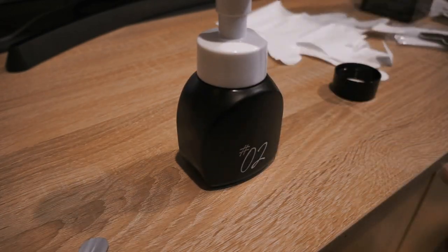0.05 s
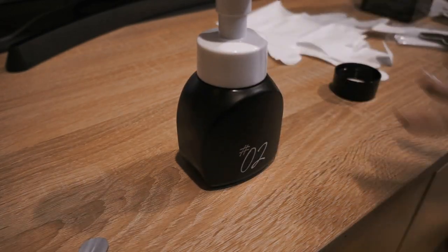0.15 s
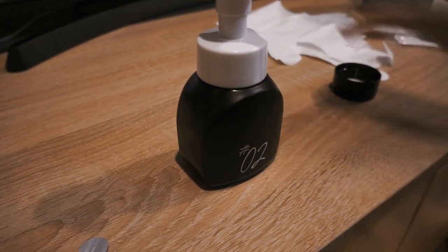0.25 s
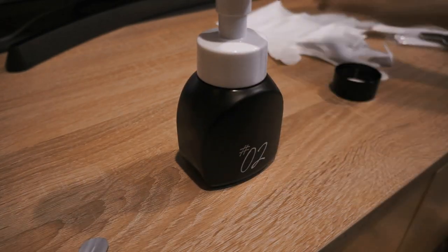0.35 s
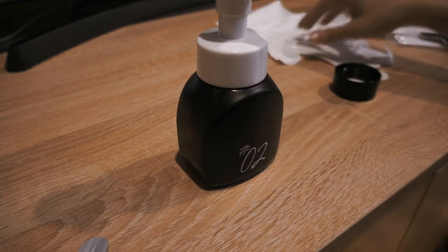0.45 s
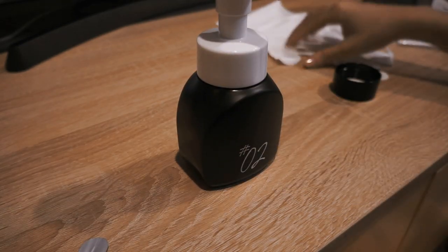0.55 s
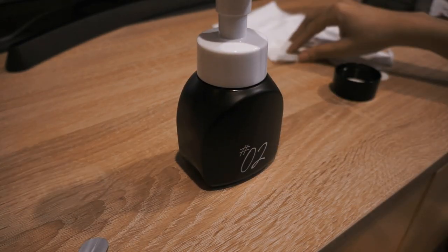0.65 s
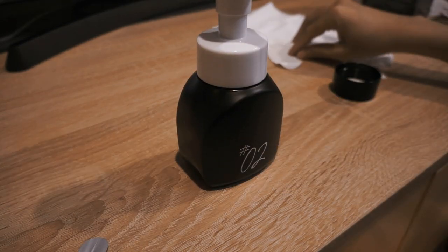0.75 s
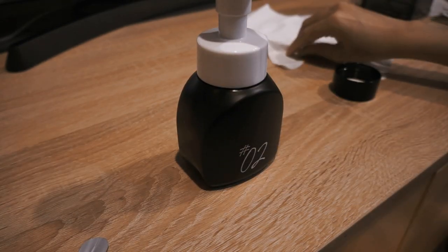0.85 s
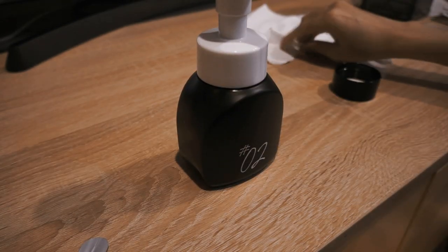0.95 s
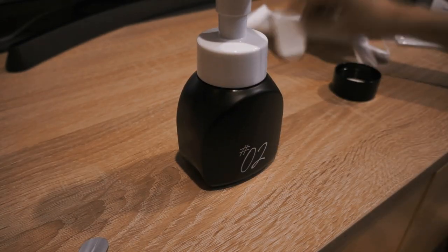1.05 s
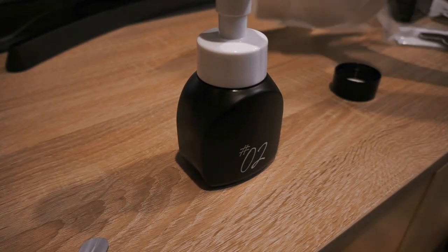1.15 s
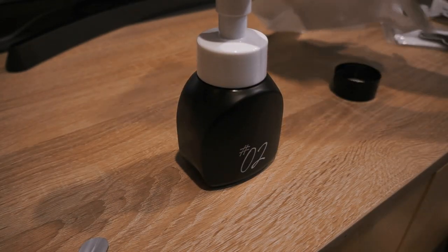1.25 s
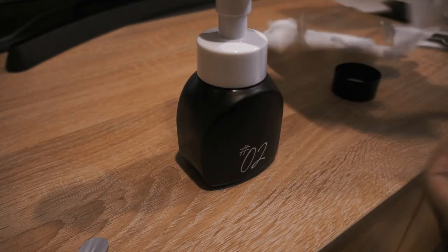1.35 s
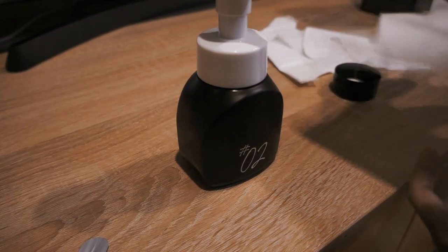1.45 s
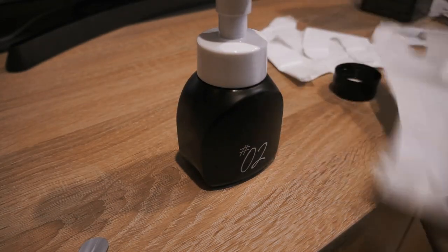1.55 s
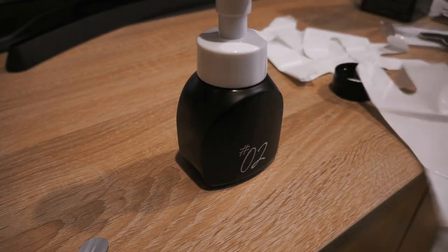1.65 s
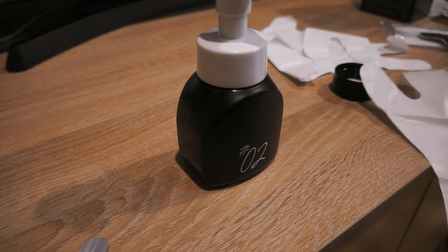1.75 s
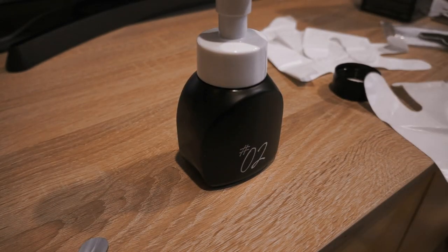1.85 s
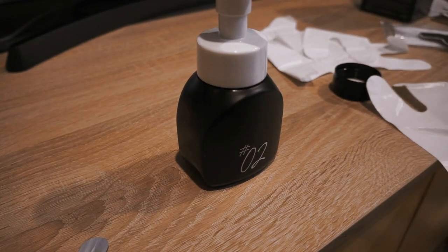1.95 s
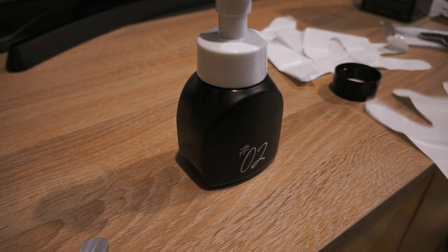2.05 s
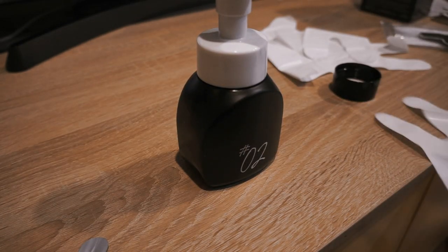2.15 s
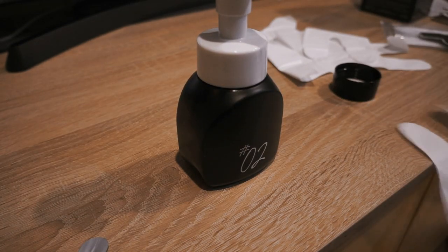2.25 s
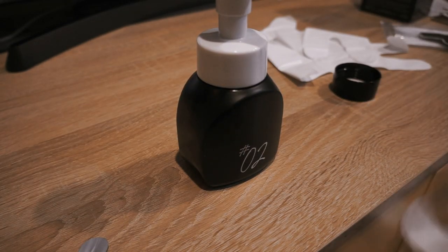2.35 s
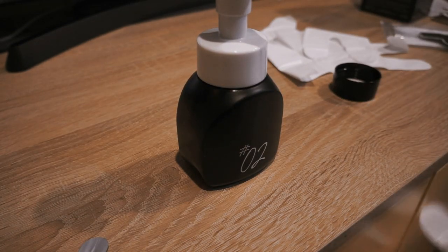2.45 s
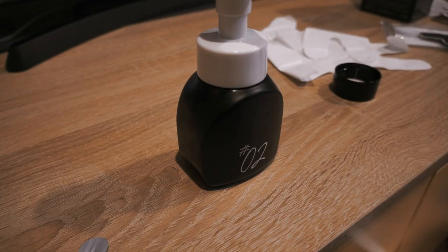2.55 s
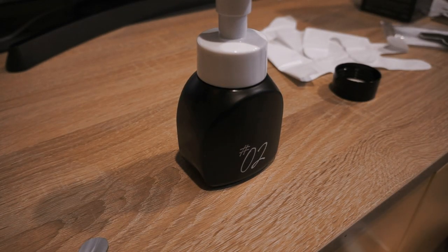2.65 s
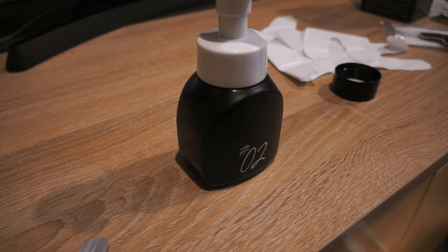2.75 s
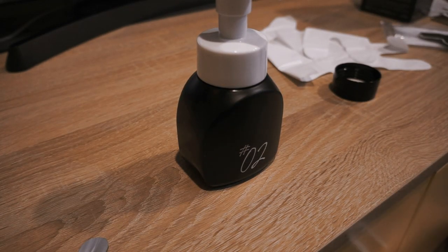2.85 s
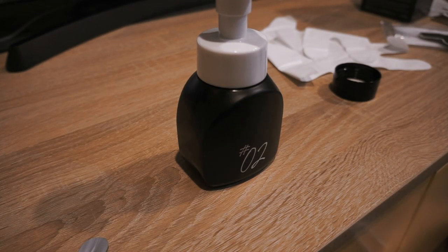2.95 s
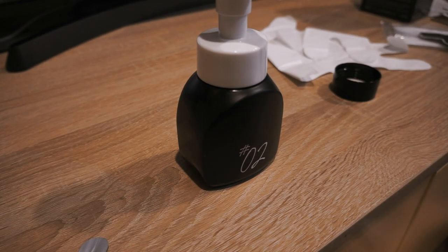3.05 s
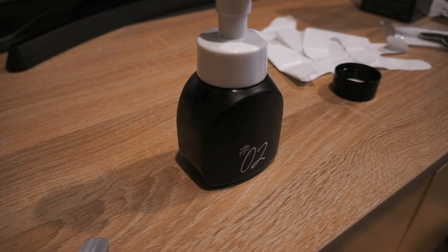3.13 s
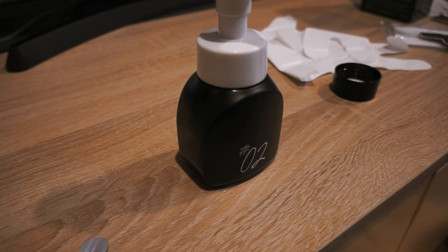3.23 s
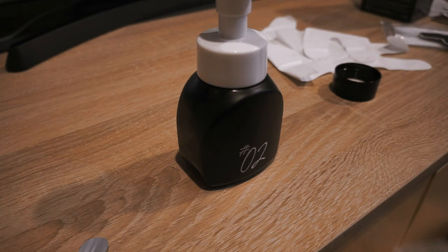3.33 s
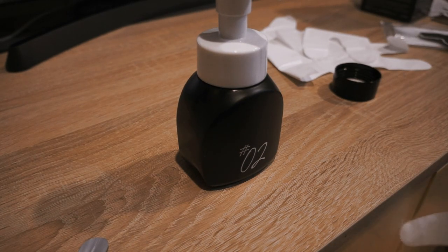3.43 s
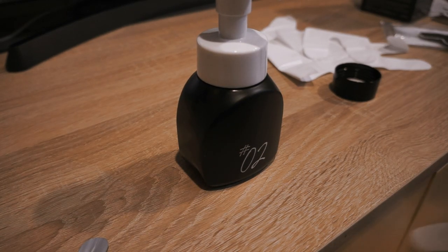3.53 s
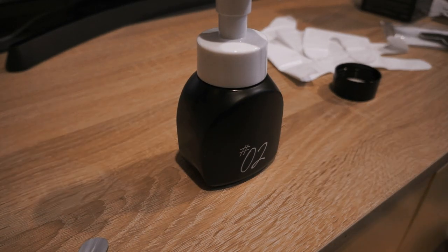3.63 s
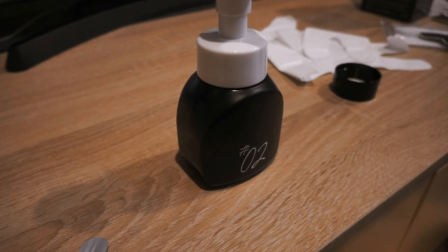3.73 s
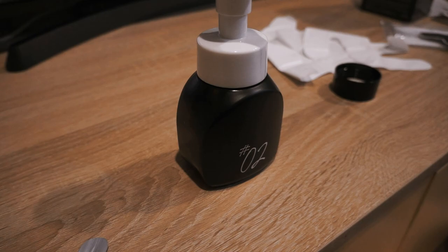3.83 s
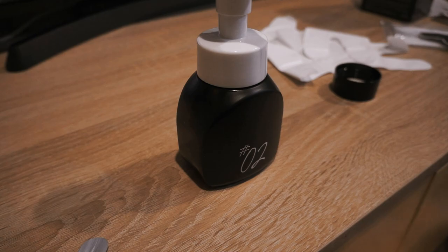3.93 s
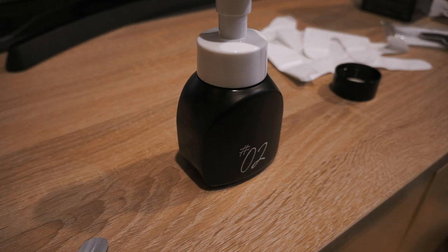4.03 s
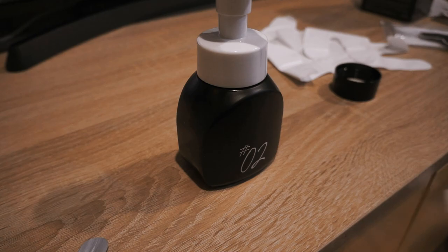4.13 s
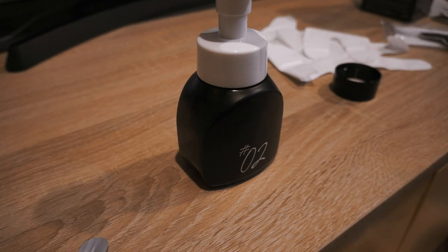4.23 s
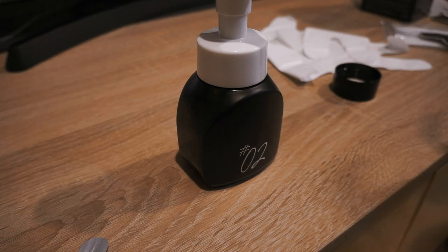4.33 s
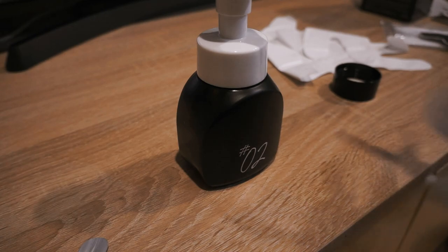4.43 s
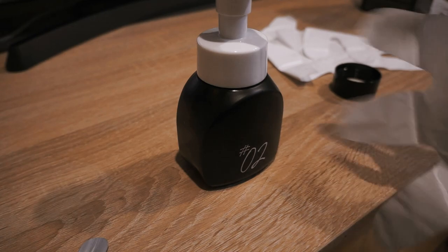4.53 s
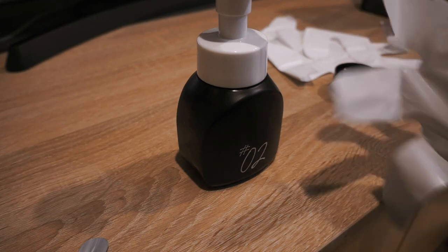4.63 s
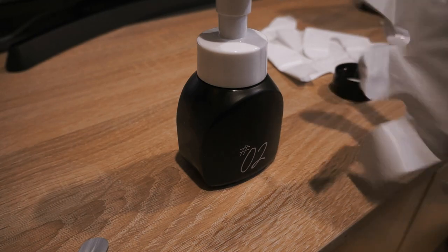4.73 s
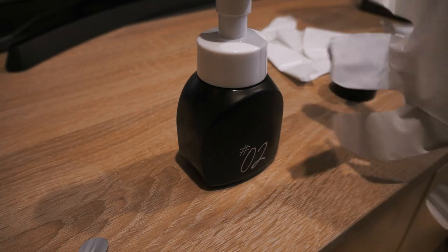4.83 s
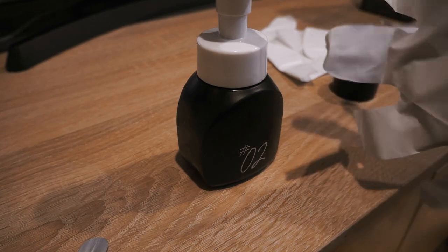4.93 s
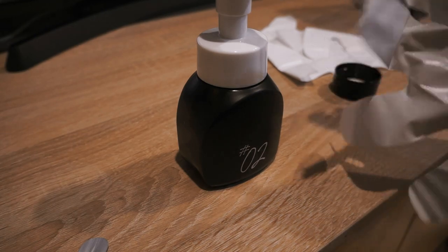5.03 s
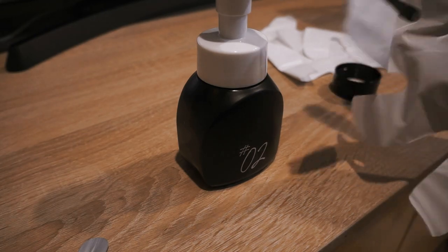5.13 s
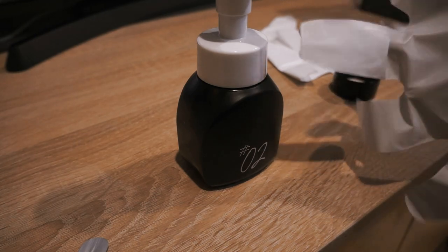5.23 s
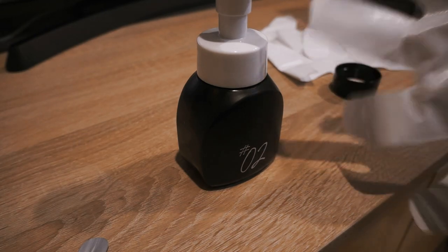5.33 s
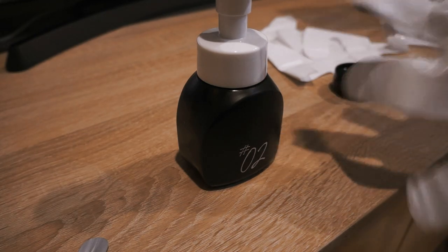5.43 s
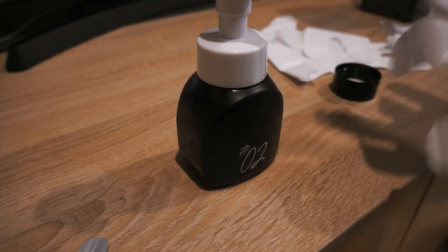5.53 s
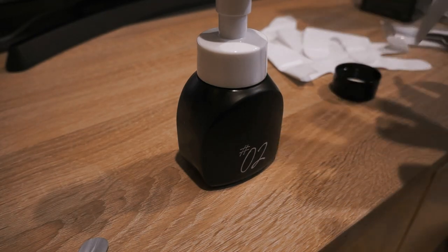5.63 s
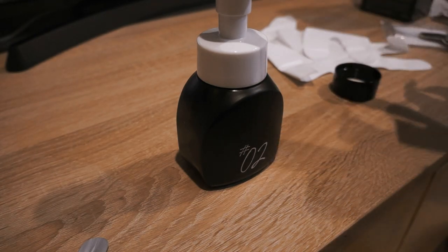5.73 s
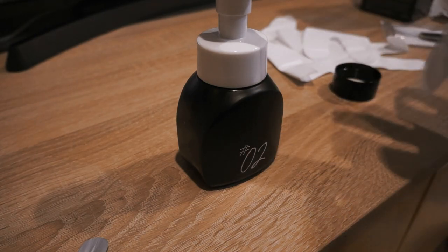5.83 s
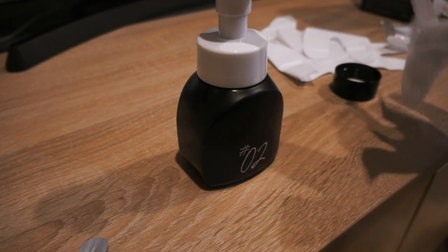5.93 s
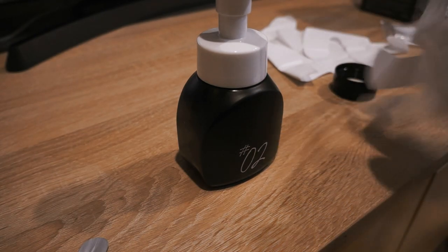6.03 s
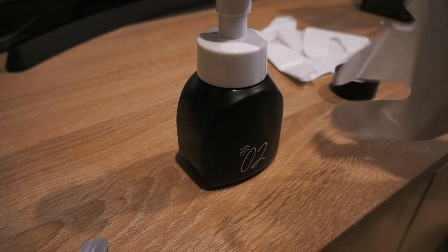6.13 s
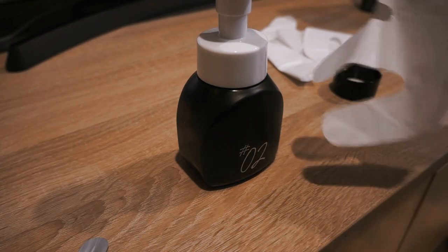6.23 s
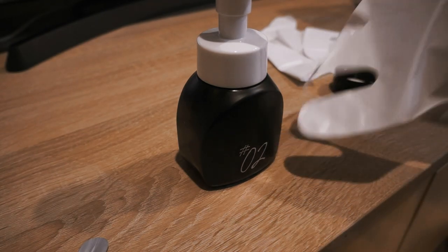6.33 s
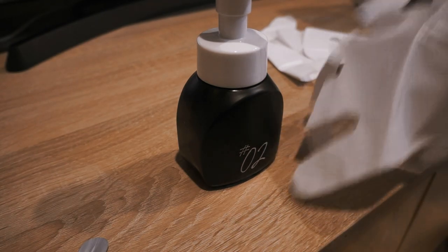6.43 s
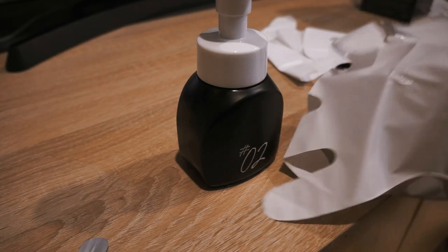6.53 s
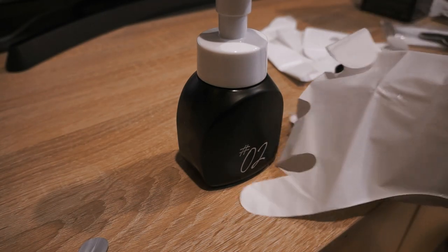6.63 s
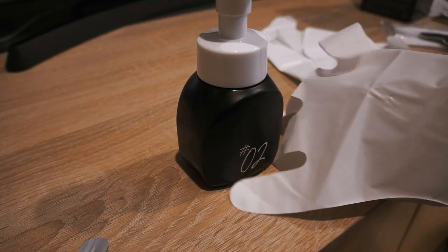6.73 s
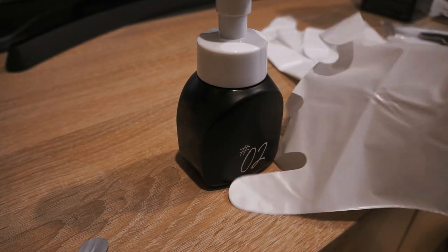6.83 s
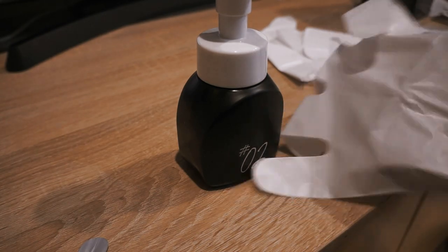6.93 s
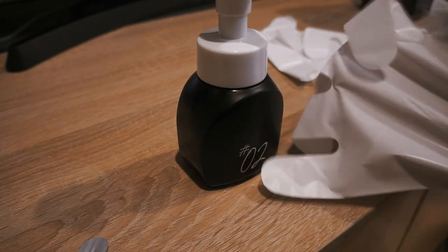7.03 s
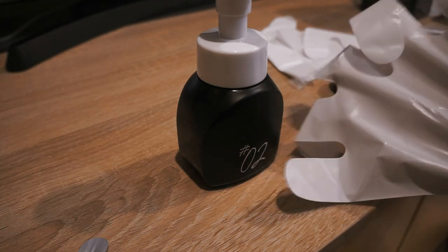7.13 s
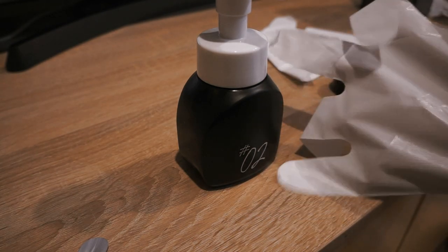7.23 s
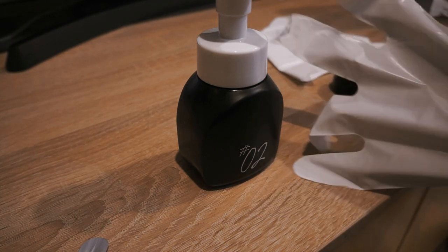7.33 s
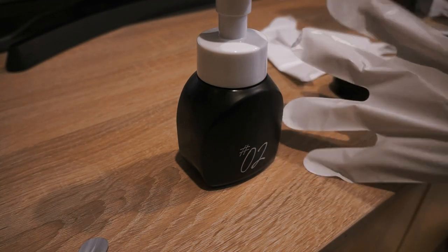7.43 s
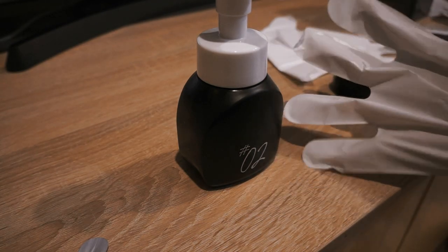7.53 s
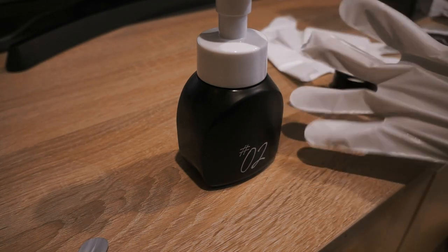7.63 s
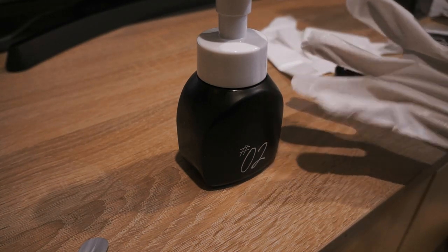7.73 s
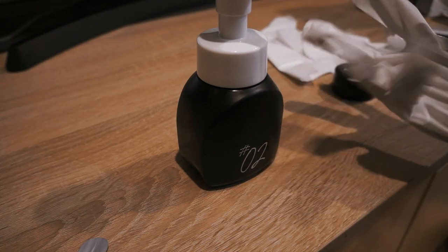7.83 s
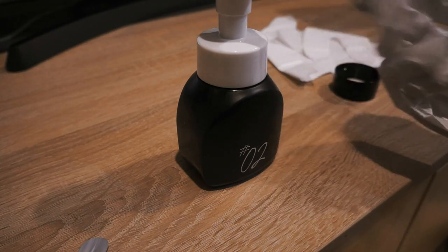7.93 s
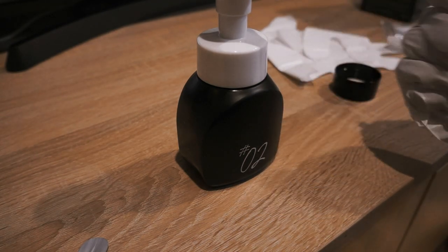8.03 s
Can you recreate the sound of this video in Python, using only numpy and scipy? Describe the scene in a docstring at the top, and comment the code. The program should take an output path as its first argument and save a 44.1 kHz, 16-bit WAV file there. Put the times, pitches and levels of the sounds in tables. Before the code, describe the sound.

Thin plastic gloves are picked up quietly, then crinkle and snap loudly at a wooden desk in a small room with a faint fan hum.

```python
"""Small room with a humming fan: after a soft brush as the arm reaches out, thin plastic gloves are
picked off a wooden desk, opened and pulled over a hand, to the right of a nearby microphone. Brush and
sliding film are shaped noise (hiss) plus sparse pulses (crackle); larger creases snap as a pulse and a
decaying noise tail; brief narrow noise bands give hollow ringing, small ticks, low puffs and bright rubbing.
A small hard plastic thing is knocked once: decaying modes plus noise. The fan is coloured noise with
three wavering tones; a faint narrow flutter fades out early on the left."""
import sys
import numpy as np
from scipy import signal
from scipy.fft import rfft, irfft
from scipy.io import wavfile
from scipy.ndimage import uniform_filter1d, map_coordinates

SR = 44100
rng = np.random.default_rng(int(sys.argv[2]) if len(sys.argv) > 2 else 0)


def generate_wav(signal):
    """Clip the signal to [-1, 1] and save it as 16-bit WAV at the path in sys.argv[1]."""
    frames = np.transpose(np.atleast_2d(signal))
    scaled = np.clip(frames, -1, 1) * 32767
    pcm = np.round(scaled).astype(np.int16)
    wavfile.write(sys.argv[1], SR, pcm)


N = 356328
TIME = np.arange(N) / SR
TOP_HZ = 11100  # upper limit of creases and recorder


def undb(db):
    """Decibels to gain."""
    return 10 ** (np.asarray(db) / 20)


def unit(x):
    """Scale to an rms of 1."""
    return x / np.sqrt(np.mean(x ** 2))


def curves(table):
    """Each column of a table joined by straight lines in time."""
    s, *columns = np.transpose(table)
    return [np.interp(TIME, s, c) for c in columns]


def butter(x, hz, kind, order=2):
    """Butterworth filter."""
    return signal.sosfilt(signal.butter(order, hz, kind, fs=SR, output="sos"), x)


def bandpass_noise(hz, width_hz):
    """Noise of rms 1 in a band centred on hz."""
    return unit(butter(rng.standard_normal(N), [hz - width_hz / 2, hz + width_hz / 2], "band"))


def colour(x, points, size=2048):
    """Causal minimum-phase filter through (f/Hz, level/dB) points, built from the cepstrum."""
    hz, db = np.transpose(points)
    f = np.maximum(np.fft.rfftfreq(size, 1 / SR), 1)
    cepstrum = irfft(np.log(undb(np.interp(np.log(f), np.log(hz), db))))
    cepstrum[1:size // 2] *= 2
    cepstrum[size // 2 + 1:] = 0
    response = irfft(np.exp(rfft(cepstrum)))
    return signal.fftconvolve(x, response)[:len(x)]


def walk(rate_hz):
    """Smooth random wander of rms 1: held random steps, averaged over one step."""
    step = max(int(SR / rate_hz), 1)
    held = np.repeat(rng.standard_normal(N // step + 1), step)[:N]
    return unit(uniform_filter1d(held, step))


def decay(t, t60_s):
    """Exponential fall by 60 dB in t60_s."""
    return np.exp(-np.log(1000) * t / t60_s)


def tail(t60_s, size):
    """Dying noise of unit energy."""
    x = rng.standard_normal(size) * decay(TIME[:size], t60_s)
    return x / np.linalg.norm(x)


def delayed(x, lag_samples):
    """Read a sound late by a moving number of samples."""
    return map_coordinates(x, [np.arange(N) - lag_samples], order=3)


# fan air spectrum, relative: f/Hz, level/dB per Hz
FAN_AIR = [(15, -82), (25, -23), (169, -23.5), (202, -16), (229, -23.5), (311, -9), (468, -8.5), (651, -4),
           (1060, -15), (1140, -13.5), (1260, -13), (1590, -22.5), (1710, -19.5), (2270, -24.5),
           (11000, -33), (14300, -79), (22000, -120)]
# fan tones: f/Hz, level/dB rms
FAN_TONES = [(201, -83.5), (637, -73), (1268, -80)]


def fan(air_db=-62, side_db=-11, wide_hz=1800, wide_db=-4, waver_db=0.5):
    """Steady air noise, wider in the treble, with tones that waver in level and phase."""
    air, across = (unit(colour(rng.standard_normal(N), FAN_AIR)) * undb(air_db) for _ in range(2))
    side = undb(side_db) * across + undb(wide_db) * butter(across, wide_hz, "high")
    tones = 0
    for hz, db in FAN_TONES:
        level = np.sqrt(2) * undb(db + waver_db * walk(5.0))
        tones = tones + level * np.sin(2 * np.pi * hz * TIME + 0.58 * walk(6))
    return np.array([air + tones + side, air + tones - side])


def flutter(hz=1750, width_hz=140, per_s=15.0, first_s=.013, db=-75, end_s=1.15, fade_s=0.74, pan_db=8):
    """Faint narrow noise band in regular beats, louder on the left, faded out early."""
    ring = bandpass_noise(hz, width_hz)
    beats = unit(np.cos(np.pi * per_s * (TIME - first_s)) ** 10)
    fade = np.clip((end_s - TIME) / fade_s, 0, 1)
    return ring * beats * fade * undb(db + np.array([[pan_db], [-pan_db]]) / 2)


# strokes: first a soft brush as the arm reaches out, then sliding film:
# start t/s, swell/s, fade/s, treble level/dB, body level re treble/dB
STROKES = [(0, .09, .17, -49, -32), (.555, 0.18, .11, -58, -20), (.803, 0.084, 0.2, -57.5, -11),
           (1.06, 0.027, .06, -50, -17), (1.11, .05, .13, -56, -14), (1.295, 0.11, 0.081, -62, -10),
           (1.55, .15, 0.17, -68, -2), (2.025, 0.4, .1, -65.5, -5), (2.401, 0.18, .11, -57.5, -11),
           (2.879, 0.028, 0.044, -56, -5), (2.943, 0.026, 0.084, -48.5, -16),
           (3.025, 0.063, .1, -55.5, -14), (3.183, 0.049, 0.15, -56, -5), (3.385, 0.04, 0.25, -61, -4.5),
           (3.611, 0.096, 0.028, -44, -14), (3.717, 0.1, 0.092, -41, -12.5),
           (3.874, 0.027, 0.048, -39.5, -9.5), (3.88, 0.21, 0.065, -46, -12.5),
           (4.128, 0.15, 0.15, -37, -9), (4.326, .085, 0.42, -35, -12.5), (4.749, 0.028, 0.16, -44.5, -6),
           (4.877, .15, 0.032, -40.5, -11), (5.029, 0.16, 0.13, -38, -11), (5.265, .11, 0.042, -44.5, -8),
           (5.408, 0.12, 0.03, -40, -10), (5.512, 0.24, .08, -50, -15), (5.825, .19, .21, -34.5, -12.5),
           (6.136, .135, .085, -41, -10.5), (6.357, 0.12, .3, -60.5, -8.5), (6.603, .18, 0.1, -55.5, -10.5),
           (6.796, .24, .1, -40, -10), (6.913, .035, 0.41, -40, -13), (7.235, 0.195, 0.113, -35, -18.5),
           (7.534, 0.067, 0.23, -38, -20), (7.783, .17, 0.079, -42, -11.5),
           (8.009, 0.043, 0.053, -42.5, -6)]


def effort(rest_db=-79, middle_share=0.49, middle_lift_db=0.7):
    """Treble/dB, body and middle re treble/dB: strokes swell and fade on a quarter sine, powers add."""
    treble = body = middle = undb(rest_db) ** 2  # film that is only held
    for start_s, swell_s, fade_s, db, body_db in STROKES:
        ramp = np.interp(TIME, start_s + np.cumsum([0, swell_s, fade_s]), [0, 1, 0])
        speed = np.sin(np.pi / 2 * ramp)
        power = (speed * undb(db)) ** 2
        treble = treble + power
        body = body + power * undb(body_db) ** 2
        middle = middle + power * undb(middle_share * body_db + middle_lift_db) ** 2
    return 10 * np.log10(treble), 10 * np.log10(body / treble), 10 * np.log10(middle / treble)


# colour of the film: f/Hz, level/dB
FILM = [(40, -31), (130, -24), (250, -14.5), (400, -6.5), (650, -2.5), (1000, 0), (1800, -1.5),
        (2600, -0.5), (4500, 0.5), (6500, 2), (8500, 5), (9700, 4), (11000, -3), (13000, -42)]


def film_bands(low_hz=1400, high_hz=4500, size=1024):
    """Unit-energy responses of the film: broad panels give the body, small wrinkles the treble."""
    response = colour(signal.unit_impulse(size), FILM)
    body = butter(response, low_hz, "low", order=3)
    middle = -butter(response, [low_hz, high_hz], "band")
    treble = butter(response, high_hz, "high", order=3)
    return [b / np.linalg.norm(b) for b in (body, middle, treble)]


def rustle(bands, treble_db, body_db, middle_db, grains_per_s=2600, spread_db=3.5, hiss_db=-3, grain_db=-4,
           stick_db=1.5, flicker_db=1.4, fold_s=0.000317, fold_db=-15, trim_db=(-2, -2, -1)):
    """Soft brush, then sliding film: smooth hiss plus tiny buckling wrinkles, denser in stronger strokes."""
    rate_per_s = grains_per_s * undb(.5 * (treble_db - treble_db.max()))
    sizes = undb(spread_db * np.minimum(rng.exponential(size=N), 3.5))
    hits = rng.random(N) < rate_per_s / SR
    wrinkles = unit(hits * sizes * rng.choice([-1, 1], N) / np.sqrt(rate_per_s))
    grip_db = treble_db + stick_db * walk(110)  # the film catches and lets go
    out = 0
    for band, rel_db, trim in zip(bands, (body_db, middle_db, 0), trim_db):
        own = unit(wrinkles * rng.random(N))  # every wrinkle has its own colour
        force = undb(grain_db) * own + undb(hiss_db) * rng.standard_normal(N)
        level_db = grip_db + rel_db + trim + flicker_db * walk(35)
        out = out + signal.fftconvolve(force, band)[:N] * undb(level_db)
    # a nearby fold reflects; colour shifts as the glove changes shape
    fold_gain = undb(fold_db) * np.tanh(walk(7))
    return out + fold_gain * delayed(out, fold_s * SR * np.exp(0.33 * walk(6.6)))


def chance_creases(treble_db, body_db, middle_db, per_s=17, rate_slope=.12, lift_db=1.0, spread_db=1.6,
                   thin_db=-5, colour_spread_db=6, count=400):
    """Small creases at random, as rows like SNAPS: more and louder in stronger strokes."""
    places, chances = rng.random((count, 2)).T
    scatters = rng.standard_normal((count, 3)) * [spread_db, colour_spread_db, colour_spread_db]
    rate_per_s = per_s * undb(rate_slope * (treble_db - treble_db.max()))
    rows = []
    for i, chance, (loud, body, middle) in zip((places * N).astype(int), chances, scatters):
        if chance < rate_per_s[i] * N / SR / count:
            rows.append((i / SR, treble_db[i] + lift_db + loud, body_db[i] + thin_db + body,
                         middle_db[i] + middle))
    return rows


# brief narrow noise bands: hollow ringing of the gloves, small ticks, low puffs, bright patches of rubbing:
# t/s, half length/s (Gaussian sigma), f/Hz, level/dB
NARROW_BANDS = [(.059, 0.0063, 1113, -54.5), (0.11, 0.076, 3140, -71), (.712, .006, 7640, -43),
                (1.624, 0.012, 1060, -58), (2.307, 0.031, 1400, -64), (2.37, .0035, 1500, -54),
                (3.808, 0.12, 564.5, -58), (4.233, 0.03, 1390, -50), (4.42, 0.12, 690, -54.5),
                (4.803, 0.0043, 129.5, -61), (5.161, 0.074, 2250, -46.5), (5.24, 0.054, 317, -65),
                (5.755, 0.026, 2950, -53.5), (6.041, .06, 2370, -41.5), (6.252, 0.053, 2340, -48.5),
                (7.027, .05, 860, -48), (7.02, 0.1, 2720, -49.5), (7.628, 0.076, 4800, -47.5),
                (7.964, 0.053, 2530, -49.5)]


def narrow_bands(width_at_1khz_hz=480, rough_db=2):
    """Noise bands swell and fade on a Gaussian, roughened in level; width grows with the root of pitch."""
    out = 0
    for s, half_s, hz, db in NARROW_BANDS:
        width_hz = min(width_at_1khz_hz * np.sqrt(hz / 1000), 1.5 * hz)
        swell = np.exp(-((TIME - s) / half_s) ** 2 / 2)
        out = out + bandpass_noise(hz, width_hz) * undb(db) * swell
    return out * undb(rough_db * walk(120))


# large creases that snap through: t/s, level/dB (before gain_db), body re treble/dB, middle re treble/dB
SNAPS = [(.6942, -47.5, -28, -9), (0.7053, -38.5, -28, -27), (0.88, -48, -9, -8), (1.0755, -48, -2, -3),
         (1.361, -52, -16, -18), (1.763, -38, -12, 1), (2.3701, -50, 9.5, 3), (2.5886, -47, -23, -26),
         (2.959, -40.5, -19, -27), (3.096, -45.5, -14, -11), (3.2304, -40, -16, -17),
         (3.3273, -40.5, -11, -20), (3.4524, -49.5, -16, 2), (3.6799, -36.5, -24, 7),
         (3.6986, -31.5, -21, -7), (3.7605, -32.5, -21, -12), (3.8909, -30, -35, -18),
         (3.969, -28.5, -23, -14), (4.2226, -29.5, 1, -5), (4.2975, -31, 1, 12), (4.307, -31.5, -13, -20),
         (4.337, -28, -34, -8), (4.3703, -25.5, -12, -10), (4.4152, -30.5, -0.5, -1),
         (4.7183, -40, -13, -7), (4.8021, -28.5, -10, 4), (5.032, -34, -29, 4), (5.0776, -34.5, -17, 1),
         (5.176, -24, -26, -12), (5.45, -30, -28, -13), (5.5043, -29.5, -19, -9), (5.638, -43.5, -25, -1),
         (5.8678, -34.5, -15, -28), (6.2745, -31, -37, -2), (6.286, -28.5, -40, 9), (6.4901, -49, -13, 10),
         (6.7468, -48.5, -1, -13), (6.9441, -35, 4, 13), (6.9806, -28.5, -9.5, -6), (7.0566, -26.5, -8, 0),
         (7.4429, -25.5, -28, -21), (7.4746, -33, -25, -20), (7.7788, -38.5, -18, -12),
         (7.8335, -35.5, -25, -32), (7.8841, -36.5, -33, -28), (7.9358, -33, -34, -7), (7.9716, -37, 0, 8),
         (8.0398, -27.5, -20, -7), (8.0484, -34, -6, 6)]


def creases(bands, small_rows, pulse_share=.46, sharper_per_db=.008, flutter_t60_s=0.015, lowest_hz=380,
            gain_db=1.0, size=2048):
    """Each crease flips with one sharp pulse, then the film around it flutters for a few milliseconds."""
    out = np.zeros(N + 2 * size)
    span_samples = .005 * SR  # level is rms over 5 ms
    for s, db, body_db, middle_db in SNAPS + small_rows:
        # energy share of the first pulse: thin, bright creases flip more sharply
        sharp = np.clip(pulse_share - sharper_per_db * body_db, 0, 1)
        force = np.sqrt(1 - sharp) * tail(flutter_t60_s, size)
        force[0] = np.sqrt(sharp) * rng.choice([-1, 1])
        response = undb(body_db) * bands[0] + undb(middle_db) * bands[1] + bands[2]
        snap = signal.fftconvolve(force, response)
        snap = butter(snap, [lowest_hz, TOP_HZ], "band")  # a small crease radiates no bass
        i = int(s * SR)
        out[i:i + len(snap)] += snap / np.linalg.norm(snap) * np.sqrt(span_samples) * undb(db + gain_db)
    return out[:N]


# contacts of the hard plastic thing: t/s, level/dB
KNOCKS = [(1.4089, -29.5), (1.4122, -35.5), (1.4208, -49)]
# its modes: f/Hz, level/dB, t60/s
KNOCK_MODES = [(640, -20, .04), (2270, -2, 0.024), (2470, 1, 0.022), (2800, -10, 0.022), (3100, -14, .03),
               (3440, -4, .04), (3800, -9, .02), (4300, -1, 0.026), (4950, -8, .025), (6700, -4, .045)]


def knock(crack_db=19, crack_t60_s=0.026, crack_hz=(1900, 4900), edge_db=-10, ring_db=-10, size=8192):
    """Hard plastic chatters against the desk: three rough contacts ring the same modes."""
    out, t = np.zeros(N), TIME[:size]
    for s, db in KNOCKS:
        ring = 0
        for hz, mode_db, t60_s in KNOCK_MODES:
            ring = ring + undb(mode_db) * np.sin(2 * np.pi * (hz * t + rng.random())) * decay(t, t60_s)
        contact = tail(crack_t60_s, size)
        crack = butter(contact, crack_hz, "band") + undb(edge_db) * contact
        i = int(s * SR)
        out[i:i + size] += undb(db) * (undb(ring_db) * ring + undb(crack_db) * crack)
    return butter(out, 400, "high")


def scatter(x, desk_db=-11, desk_t60_s=0.036, room_db=-8.5, room_t60_s=0.27, moves_per_s=45, count=8,
            size=16384):
    """Desk and room reflections; the paths keep changing as the film moves."""
    shares = np.array([walk(moves_per_s) for _ in range(count)])
    shares /= np.linalg.norm(shares, axis=0)
    out = 0
    for share in shares:
        path = undb(desk_db) * tail(desk_t60_s, size) + undb(room_db) * tail(room_t60_s, size)
        out = out + signal.oaconvolve(x * share, path)[:N]
    return out


# direction of the gloves: t/s, left gain above the bass/dB, lag of the direct sound at the left port/samples
PAN = [(0, -6, -2.5), (1.7, -5.5, 5.5), (2.4, -4, 6), (3.3, -2.5, 5), (3.9, -4, 7), (4.4, -4, 4.5),
       (5.1, -7.5, 4), (5.8, -4, -1.5), (6.3, -6.5, 0.5), (7, -6, 2.5), (8, -6.5, 1)]


def room(x, wall_s=0.014, wall_db=-23, wide_hz=1150, bass_hz=220, bass_side_db=-5, left_db=-5.0,
         left_wet_db=1):
    """Direct sound favours the right port; scatter and a wall echo follow, most alike in the lower middle."""
    pan_db, lag_samples = curves(PAN)
    mid, across = scatter(x), scatter(x)
    side = butter(across, wide_hz, "high") + undb(bass_side_db) * butter(across, bass_hz, "low")
    echo = undb(wall_db) * delayed(x, wall_s * SR * (1 + 0.023 * walk(3)))
    direct = delayed(x, lag_samples) * undb(left_db)
    near = direct + undb(left_wet_db) * 1.49 * (mid + side) + echo
    # long waves bend round the microphone body
    bass = signal.sosfiltfilt(signal.butter(2, 700, fs=SR, output="sos"), near)
    left = 1.31 * bass + (near - bass) * undb(pan_db)
    right = 1.145 * x + echo + 1.247 * (mid - side)
    return np.array([left, right])


def scene():
    """Brush, gloves and knock in the room, over the fan and the flutter."""
    bands, levels = film_bands(), effort()
    gloves = rustle(bands, *levels) + narrow_bands() + creases(bands, chance_creases(*levels))
    return room(gloves + knock()) + fan() + flutter()


def record(dry):
    """The recorder cuts the top steeply: elliptic low-pass."""
    return signal.sosfilt(signal.ellip(10, .2, 70, TOP_HZ, fs=SR, output="sos"), dry)


dry = scene()
out = record(dry)
generate_wav(out)
```